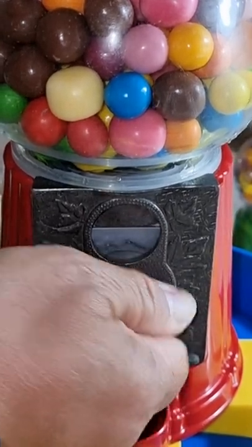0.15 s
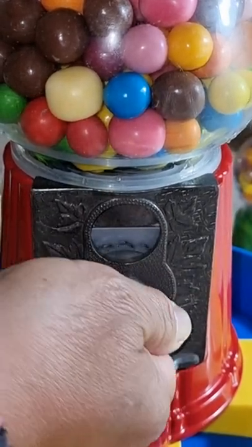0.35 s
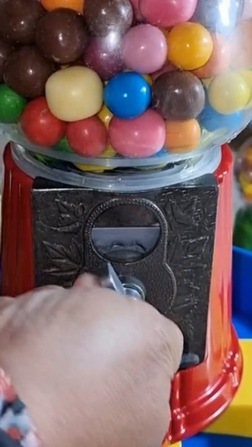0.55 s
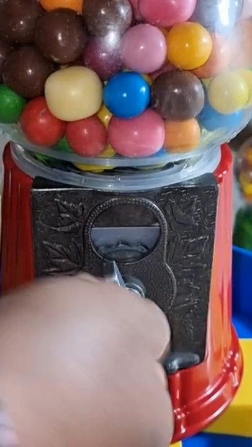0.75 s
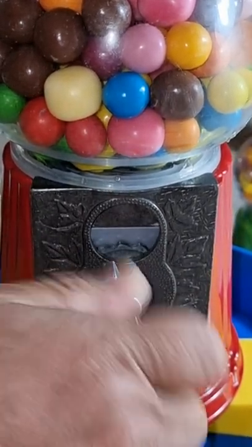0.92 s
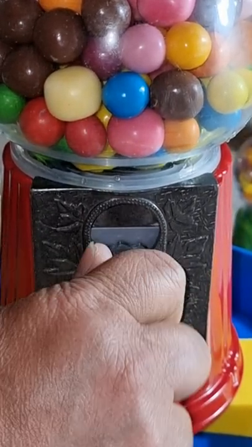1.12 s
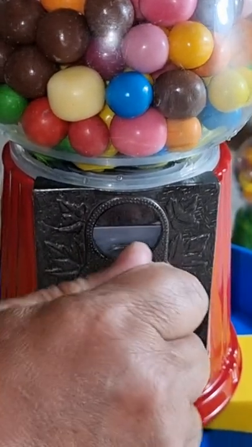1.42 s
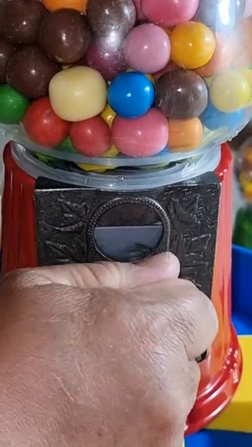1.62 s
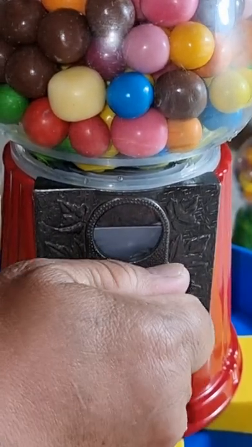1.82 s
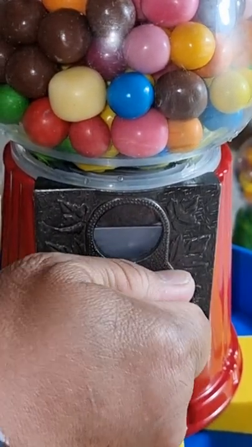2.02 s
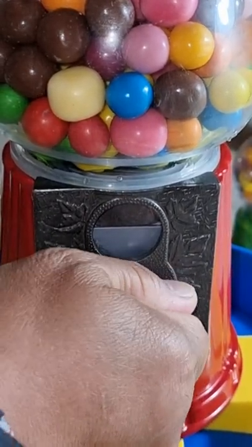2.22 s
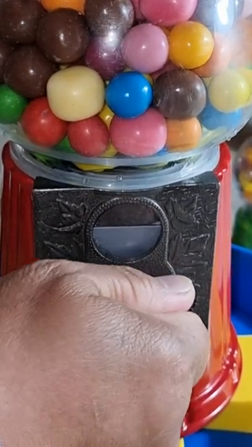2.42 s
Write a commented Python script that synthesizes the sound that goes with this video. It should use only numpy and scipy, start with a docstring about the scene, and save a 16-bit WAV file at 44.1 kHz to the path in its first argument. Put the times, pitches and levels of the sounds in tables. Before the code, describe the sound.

A toy gumball machine's crank is turned close up: rapid ratchet snaps and grinding, gumballs knocking, light finger taps during a new grip, then one sharp clack and a final hard clack in a live room.

```python
"""A live room, with a toy gumball machine close to the microphones: a hand turns its metal crank.
The ratchet snaps and grinds, gumballs knock about, the fingers take a new grip, and the crank clacks on to its stop.
Contacts are bursts of micro-impacts ringing metal, plate or handle; friction is a stream of tiny slips.
Some contacts ping as decaying tones, the stand booms, and the housing rumbles as band-passed noise.
The room answers with a decaying noise tail, over a low hum and soft air noise."""
import sys
import numpy as np
from scipy import signal
from scipy.fft import rfft, irfft
from scipy.io import wavfile

SR = 44100
rng = np.random.default_rng(int(sys.argv[2]) if len(sys.argv) > 2 else 0)


def bounce(signal):
    """Save signal as a 16-bit WAV file at the path given by the first command-line argument."""
    frames = np.transpose(np.atleast_2d(signal))
    limited = np.clip(frames, -1, 1)
    pcm = np.round(limited * 32767).astype(np.int16)
    wavfile.write(sys.argv[1], SR, pcm)


N = 112454
PRE = SR // 10  # run-in of 0.1 s, cut off at the end, so that sound is already under way at time 0
M = N + PRE
TIME = (np.arange(M) - PRE) / SR  # seconds

# Resonances of the ratchet and housing: centre_hz, width_hz, lift_db
CRANK_MODES = [(384, 15, 9), (531, 26, 5.5), (713, 45, 20), (1231, 110, 7), (1888, 90, 2.5),
               (2658, 100, 7.5), (4227, 64, 0.5), (4705, 63, 7.5), (5635, 240, 3), (6280, 34, 11.5),
               (6720, 55, 8), (7464, 52, -2), (10960, 37, 12.5)]
# Room: centre_hz, t60_s, tail_level_db, left-right likeness of the direct sound (no unit)
ROOM = [(350, 0.53, -6.5, 0.71), (760, 0.4, -6.5, 0.83), (1460, 0.41, -10, 0.38), (2970, 0.37, -3.5, .1),
        (5940, 0.43, -8, 0.024), (10400, 0.36, -4, 0.035), (15000, 0.3, -1, 0.037)]
# Stereo width of the room's tail and its air noise: centre_hz, left-right likeness (no unit)
TAIL_LIKENESS = [(200, 0.76), (700, 0.64), (1500, .1), (4000, 0.02)]


def from_db(db):
    """Decibels to gain."""
    return 10 ** (np.asarray(db) / 20)


def rms_one(x):
    """Scale to rms 1."""
    return x / np.sqrt(np.mean(x ** 2) + 1e-24)


def level_over_time(points):
    """Gain along the whole scene, from (s, dB) points joined by straight lines in decibels."""
    return from_db(np.interp(TIME, *np.transpose(points)))


def at_hz(points, hz, axis=1):
    """Read a column of a table on a log-frequency axis."""
    p = np.array(points)
    return np.interp(np.log(hz + 1), np.log(p[:, 0]), p[:, axis])


def band(x, low_hz, high_hz):
    """Causal band-pass."""
    return signal.sosfilt(signal.butter(2, [low_hz, high_hz], "band", fs=SR, output="sos"), x)


def widen(pair, likeness):
    """Two unrelated signals become left and right of a given likeness."""
    c = np.clip(likeness, -.99, .99)
    middle = np.sqrt(1 + c) * pair[0]
    side = np.sqrt(1 - c) * pair[1]
    return (middle + side * np.array([[1], [-1]])) / np.sqrt(2)


def body(x, modes):
    """Each resonance rings on top of the dense response of the body."""
    out = x.copy()
    for hz, width_hz, lift_db in modes:
        r = np.exp(-np.pi * width_hz / SR)  # pole radius: the wider the resonance, the sooner it dies
        numerator = [(1 - r * r) / 2, 0, (r * r - 1) / 2]
        denominator = [1, -2 * r * np.cos(2 * np.pi * hz / SR), r * r]
        out += from_db(lift_db) * signal.lfilter(numerator, denominator, x + 1e-18)
    return out


def chatter(length_s, decay_s):
    """A first touch and a few milliseconds of micro-impacts with a fairly even spectrum, as two unrelated signals."""
    attack_s = .0008
    first_touch = .22  # strength of the first touch against the chatter that follows
    t = np.arange(SR // 8) / SR
    shape = np.minimum(t / attack_s, 1) * np.exp(-np.maximum(t - length_s, 0) / decay_s)
    impacts = rng.standard_normal((2, len(t))) * shape
    impacts[0, np.argmax(shape)] += first_touch * np.sqrt(np.sum(shape ** 2))
    spectrum = rfft(impacts)
    even = irfft(spectrum / (abs(spectrum) + 1e-12), len(t))
    return even * np.sqrt(shape)


def voiced(x, levels_db, size):
    """Give each band its level, taken over the first size samples, and its stereo width."""
    # Edges of the bands in which every contact has a strength: edge_hz
    band_edges = [175, 1000, 2200, 4400, 8500, 17000]
    out = 0
    for low, high, db in zip(band_edges, band_edges[1:], levels_db):
        filtered = signal.sosfilt(signal.butter(3, [low, high], "band", fs=SR, output="sos"), x)
        part = widen(filtered, at_hz(ROOM, np.sqrt(low * high), axis=3))
        out = out + part * from_db(db) / np.sqrt(np.mean(part[:, :size] ** 2))
    return out


def contacts(rows, modes, decay_s, room_db, own_width_hz=54, own_lift_db=17.5):
    """Each contact chatters and rings the body, with one ring of its own: (direct sound, sound sent into the room)."""
    room_colour = 0.58  # share of the resonances' lift in dB that is left in the sound sent all round the room
    out = np.zeros((2, 2, M + SR))
    for s, length_s, own_hz, *levels_db in rows:
        force = chatter(length_s, decay_s)
        start = PRE + int(s * SR)
        all_modes = [*modes, (own_hz, own_width_hz, own_lift_db)]
        for way, colour in enumerate((1, room_colour)):
            rings = [(hz, width_hz, colour * db) for hz, width_hz, db in all_modes]
            # band levels hold over the first 8 ms
            out[way, :, start:start + force.shape[1]] += voiced(body(force, rings), levels_db, size=SR // 125)
    return np.array([out[0, :, :M], from_db(room_db) * out[1, :, :M]])


def background():
    """A low hum of sines wavering in strength and phase, and soft room noise shaped in frequency."""
    # Colour of the air noise, ahead of its overall level: centre_hz, relative_level_db
    air_colour = [(25, -12.5), (70, 4), (105, -2), (140, -8.5), (250, -25.5), (450, -15.5), (750, -19),
                  (1500, -25), (4000, -28), (8000, -36), (16000, -53)]
    # Hum lines, rms ahead of the waver: pitch_hz, level_db
    hum_lines = [(68, -66), (135, -66), (204, -79)]
    air_db = -64
    waver_depth = 0.41  # as a share of the strength, and in radians of phase
    hz = np.arange(M // 2 + 1) * SR / M
    noise = widen(rfft(rng.standard_normal((2, M))), at_hz(TAIL_LIKENESS, hz))
    air = irfft(noise * from_db(at_hz(air_colour, hz)), M)
    hum = 0
    for line_hz, db in hum_lines:
        waver = waver_depth * signal.resample(rng.standard_normal((2, 36)), M, axis=1)  # slow random curves
        tone = np.sin(2 * np.pi * line_hz * TIME + waver[1])
        hum = hum + from_db(db) * np.sqrt(2) * (1 + waver[0]) * tone
    return from_db(air_db) * rms_one(air) + hum


def stand():
    """Hard clacks set the stand booming at one low pitch."""
    # Shakes of the stand, level ahead of the soft rise: start_s, level_db
    thumps = [(0.221, -54), (0.467, -53), (1.576, -46), (1.751, -39), (2.213, -25.5)]
    pitch_hz, t60_s, rise_s = 71, 0.27, .008
    out = 0
    for s, db in thumps:
        t = np.maximum(TIME - s, 0)
        envelope = from_db(db - 60 * t / t60_s) * (1 - np.exp(-t / rise_s))
        out = out + envelope * np.sin(2 * np.pi * pitch_hz * t)
    return out


def hand():
    """The hand rubs and presses on the housing: band-passed noise, nearly alike on both sides, as a dull rumble."""
    # Rumble under the hand: time_s, level_db
    rumble_curve = [(0, -74), (.43, -83), (.475, -50), (.54, -61.5), (.66, -67), (.76, -79), (1.0, -74),
                    (1.04, -61), (1.12, -67.5), (1.17, -74), (1.26, -65.5), (1.42, -64), (1.52, -72.5),
                    (1.72, -67), (1.77, -59.5), (1.9, -74.5), (2.55, -73.5)]
    rumble = band(widen(rng.standard_normal((2, M)), .93), low_hz=112.7, high_hz=258)
    return rms_one(rumble) * level_over_time(rumble_curve)


def taps():
    """Fingers tap lightly on the handle, whose resonances they damp."""
    # Taps: start_s, contact_length_s, own_ring_hz, then level_db in each band from low to high, ahead of level_db below
    tap_rows = [(0.114, 0.0015, 2736, -56, -49.5, -49.5, -56.5, -68),
                (1.107, 0.0022, 1770, -78, -58, -65.5, -90.5, -87),
                (1.265, 0.0017, 2070, -47.5, -37, -45, -55, -63.5),
                (1.343, 0.0024, 3610, -69.5, -51.5, -52.5, -63, -74),
                (1.392, 0.0063, 1040, -50.5, -45, -62, -66, -85.5),
                (1.406, 0.0044, 740, -52.5, -59, -65, -80.5, -90),
                (1.55, 0.0064, 4200, -54.5, -69, -49.5, -52.5, -58.5)]
    # Resonances of the handle: centre_hz, width_hz, lift_db
    handle_modes = [(720, 110, 14), (1380, 280, 9.5), (2650, 200, 10)]
    level_db = -1.2
    return from_db(level_db) * contacts(tap_rows, handle_modes, decay_s=0.0013, room_db=1.6,
                                        own_width_hz=110, own_lift_db=14)


def pings():
    """Some snaps and taps also ring with a single decaying tone, reaching each ear in a different phase."""
    # Pings, level ahead of the soft rise: start_s, pitch_hz, level_db, t60_s
    ping_rows = [(.312, 11040, -16, .07), (.439, 2642, -20, 0.11), (.818, 5020, -31, 0.049),
                 (1.108, 1856, -49.5, 0.075), (1.344, 1970, -48, .06)]
    rise_s = 0.0016
    ear_phases = rng.uniform(0, 2, (len(ping_rows), 2, 1))  # radians
    out = 0
    for (s, hz, db, t60_s), phases in zip(ping_rows, ear_phases):
        t = np.maximum(TIME - s, 0)
        envelope = from_db(db - 60 * t / t60_s) * (1 - np.exp(-t / rise_s))
        out = out + envelope * np.sin(2 * np.pi * hz * t + phases)
    return out


def knocks():
    """Gumballs knock on the turning plate and the globe and make them ring."""
    # Knocks: start_s, contact_length_s, own_ring_hz, then level_db in each band from low to high, ahead of level_db below
    knock_rows = [(0.4645, 0.0047, 6500, -21.5, -13.5, -21.5, -17.5, -24.5),
                  (0.4995, 0.0034, 4700, -38, -18, -38.5, -21.5, -25),
                  (0.508, 0.004, 4910, -50.5, -36, -19, -19.5, -28.5),
                  (0.539, 0.004, 4740, -32, -22.5, -28.5, -18.5, -24),
                  (0.601, 0.0049, 4910, -31, -14.5, -24.5, -22.5, -32),
                  (0.607, 0.0047, 13610, -38, -29.5, -22.5, -16.5, -19),
                  (0.648, 0.0087, 4830, -33.5, -22.5, -27, -24, -32),
                  (0.661, 0.0058, 5000, -40, -36, -34, -29.5, -42),
                  (0.797, 0.0067, 6360, -50.5, -42.5, -42.5, -40, -60.5),
                  (0.841, 0.0063, 744, -48.5, -42.5, -51, -47.5, -73.5)]
    # Resonances of the plate and globe: centre_hz, width_hz, lift_db
    globe_modes = [(219, 9.2, 12.5), (369, 32, 14.5), (530, 40, 10), (753, 79, 28), (914, 23, 13.5),
                   (1302, 140, 21), (1386, 170, 7.5), (1590, 60, -2), (2070, 23, 16.5), (2938, 260, 6),
                   (4400, 18, -17.5), (5020, 57, 9.5), (6164, 50, 10.5), (14400, 450, 14)]
    level_db = -1.13
    return from_db(level_db) * contacts(knock_rows, globe_modes, decay_s=.004, room_db=-0.1,
                                        own_width_hz=88, own_lift_db=10.5)


def friction():
    """Tiny slips of the turning parts excite the crank's resonances."""
    # Friction of the turning mechanism: time_s, level_db
    friction_curve = [(0, -103), (.22, -47), (.305, -39), (.33, -28), (.40, -41), (.43, -37.5),
                      (.52, -23.5), (.58, -34.5), (.66, -31), (.75, -46.5), (.9, -71.5), (1.15, -73),
                      (1.42, -60), (1.52, -81), (1.72, -58.5), (1.8, -62), (2.1, -79.5), (2.55, -78.5)]
    # Balance of the bands from low to high, ahead of the curve: level_db
    friction_bands_db = [-10.5, -4.5, -2.5, -6, -27]
    grains_per_s, grain_spread_db = 900, 1
    sizes = from_db(grain_spread_db * np.minimum(rng.exponential(1, M), 4))
    happens = rng.random(M) < grains_per_s / SR
    slips = happens * sizes * rng.standard_normal((2, M))
    grind = voiced(body(slips, CRANK_MODES), friction_bands_db, size=M)
    return grind * level_over_time(friction_curve)


def clacks():
    """The regripped crank takes up its slack and rings its shaft and face plate."""
    # Clacks: start_s, chatter_length_s, own_ring_hz, then level_db in each band from low to high, ahead of level_db below
    clack_rows = [(1.575, 0.0031, 6370, -50, -47, -39.5, -33, -36.5),
                  (1.596, 0.0012, 725, -48, -47.5, -51, -48, -54.5),
                  (1.748, 0.0019, 4810, -37.5, -27.5, -24.5, -14.5, -21),
                  (1.863, 0.0082, 4080, -64.5, -57.5, -42, -40.5, -48.5)]
    # Resonances of the shaft and face plate: centre_hz, width_hz, lift_db
    shaft_modes = [(378, 45, 14), (540, 48, 8.5), (716, 27, 21.5), (1338, 30, 19.5), (1765, 76, 17),
                   (2870, 110, 13.5), (3090, 110, 6), (3660, 110, 11), (5495, 440, 16), (6490, 620, 16),
                   (6910, 100, 11.5), (7200, 90, 11), (8360, 90, 10), (12450, 270, 2)]
    level_db = 1.5
    return from_db(level_db) * contacts(clack_rows, shaft_modes, decay_s=0.00073, room_db=-2)


def stop():
    """The crank meets its stop, which rings."""
    # The blow: start_s, chatter_length_s, own_ring_hz, then level_db in each band from low to high, ahead of level_db below
    stop_rows = [(2.2087, 0.0028, 6545, -38, -28, -21, -15.5, -19.5)]
    # Resonances of the stop: centre_hz, width_hz, lift_db
    stop_modes = [(374.5, 48, 8), (730, 120, 11), (1345, 100, 21), (2633, 170, 6), (2960, 150, 6.5),
                  (4100, 230, 0.5), (4890, 130, 12), (5010, 140, 8.5), (6940, 140, 15), (7350, 110, 5),
                  (11800, 190, 15), (14320, 400, 8)]
    level_db = -0.67
    return from_db(level_db) * contacts(stop_rows, stop_modes, decay_s=0.0027, room_db=2.36)


def snaps():
    """The ratchet snaps as the crank goes round, and rings with its housing."""
    # Snaps: start_s, chatter_length_s, own_ring_hz, then level_db in each band from low to high, ahead of level_db below
    snap_rows = [(-0.045, 0.0057, 5030, -35.5, -23, -18.5, -16, -26),
                 (0.164, 0.0053, 2676, -72, -52, -43.5, -51, -81),
                 (0.2185, 0.0014, 5050, -37, -26.5, -20, -17.5, -31),
                 (0.3122, 0.0023, 2773, -40.5, -28, -15, -15, -21.5),
                 (0.332, 0.0066, 6780, -49, -55, -22.5, -16.5, -21),
                 (0.345, 0.004, 3800, -52, -52, -27, -19, -37),
                 (0.3575, 0.005, 4070, -34, -42, -17.5, -16, -23),
                 (0.3688, 0.006, 6880, -37, -26, -18.5, -13, -25),
                 (0.381, 0.0099, 4047, -50, -45, -18.5, -18.5, -27),
                 (0.394, 0.0027, 4000, -51, -46, -39, -22, -34),
                 (0.401, 0.0026, 7470, -51, -53, -38, -19.5, -36),
                 (0.416, 0.0058, 4714, -60, -55, -29, -21.5, -31),
                 (0.439, 0.015, 2700, -38, -31.5, -20.5, -22.5, -36),
                 (0.694, 0.006, 7950, -63, -44, -46, -23.5, -26.5),
                 (0.723, 0.0031, 13060, -72, -33, -46, -33, -29),
                 (0.744, 0.00093, 7920, -63, -54.5, -59, -30.5, -38),
                 (0.758, 0.00059, 8230, -52, -47.5, -49, -35.5, -54),
                 (0.77, 0.0007, 6290, -63.5, -56, -54, -35.5, -36.5),
                 (0.817, 0.0057, 5030, -48.5, -44, -37.5, -35.5, -55.5),
                 (1.448, 0.003, 2680, -50, -44, -43.5, -45.5, -76)]
    level_db = -0.95
    return from_db(level_db) * contacts(snap_rows, CRANK_MODES, decay_s=0.0064, room_db=-1.08)


def room(x):
    """Quick reflections from nearby things, then a diffuse tail that dies away at its own pace in each band."""
    delay_s, onset_s = 0.0021, 0.0016
    early_db, early_decay_s = -7.5, 0.022
    t = np.arange(SR * 3 // 4) / SR
    late = np.maximum(t - delay_s, 0)
    onset = 1 - np.exp(-late / onset_s)
    early = rms_one(onset * np.exp(-late / early_decay_s))
    edges = np.geomspace(150, 18000, 13)
    response = 0
    for low, high in zip(edges, edges[1:]):
        hz = np.sqrt(low * high)
        tail = rms_one(onset * from_db(-60 * late / at_hz(ROOM, hz)))
        shape = np.hypot(from_db(at_hz(ROOM, hz, axis=2)) * tail, from_db(early_db) * early)
        noise = widen(rng.standard_normal((2, len(t))), at_hz(TAIL_LIKENESS, hz))
        response = response + band(noise * shape, low, high)
    return signal.fftconvolve(x, response / np.sqrt(len(t)), axes=1)[:, :M]


def scene():
    """The machine in its room."""
    pan_db, low_pan_db = -0.05, -0.9  # gain of the left side; the right gets the opposite
    # friction goes equally to the direct sound and into the room
    direct, sent = taps() + knocks() + friction() + clacks() + stop() + snaps()
    direct = direct + pings()
    lows = (background() + stand() + hand()) * from_db([[low_pan_db], [-low_pan_db]])
    sound = (direct + room(sent)) * from_db([[pan_db], [-pan_db]]) + lows
    return sound[:, PRE:]


def record(dry):
    """Peaks clip at full scale, then a steep low-pass cuts the top."""
    cutoff_hz = 15900
    low_pass = signal.ellip(10, .2, 75, cutoff_hz, fs=SR, output="sos")
    return signal.sosfilt(low_pass, np.clip(dry, -1, 1))


dry = scene()
out = record(dry)
bounce(out)
```